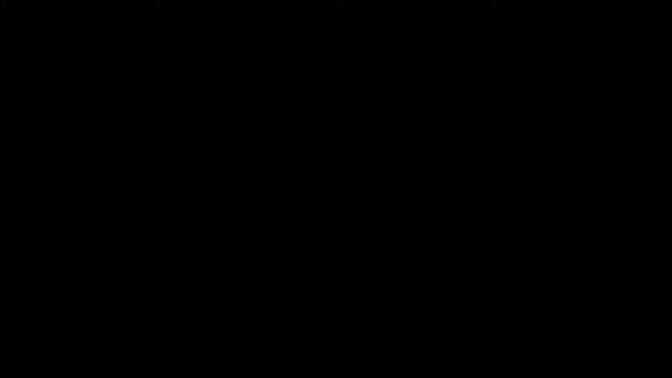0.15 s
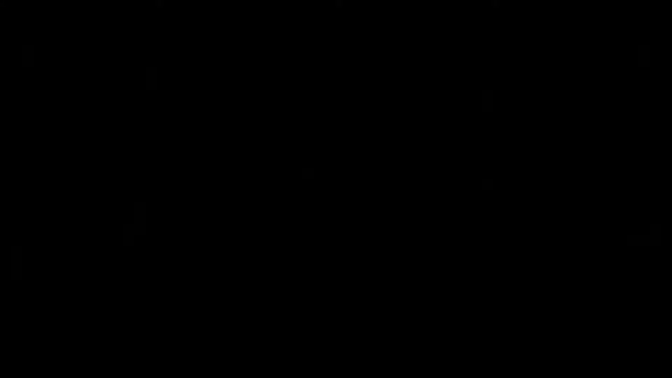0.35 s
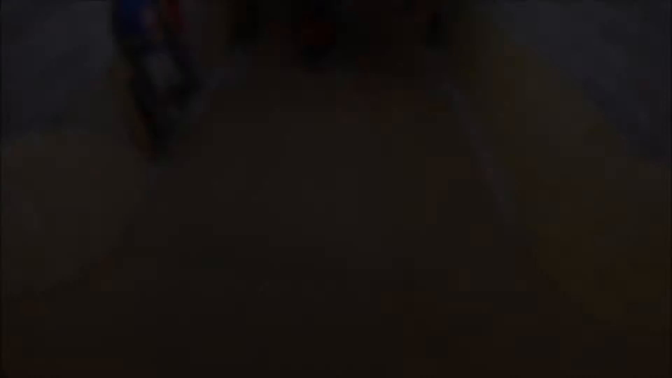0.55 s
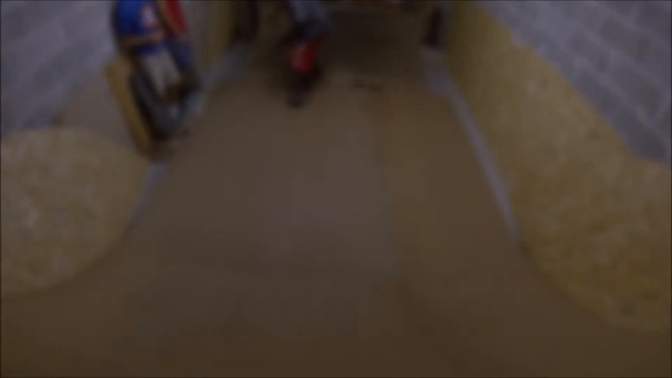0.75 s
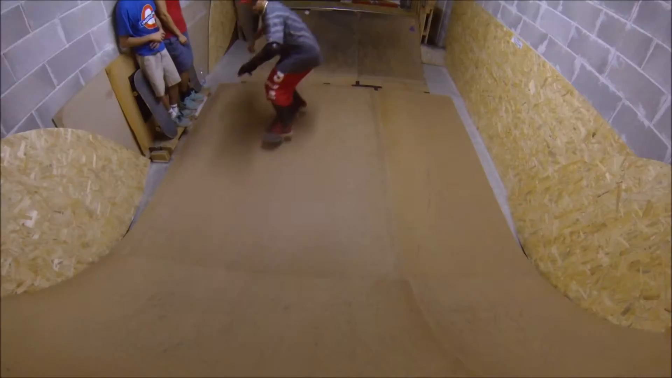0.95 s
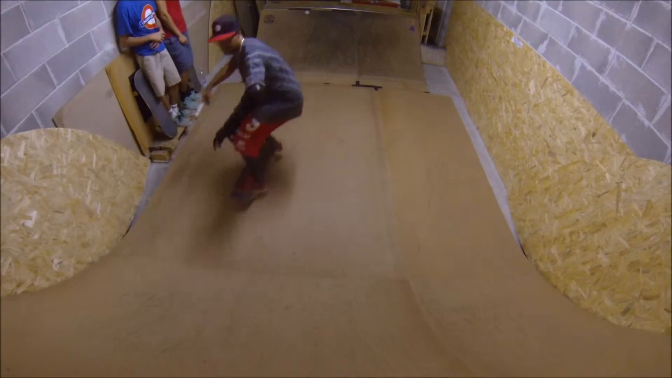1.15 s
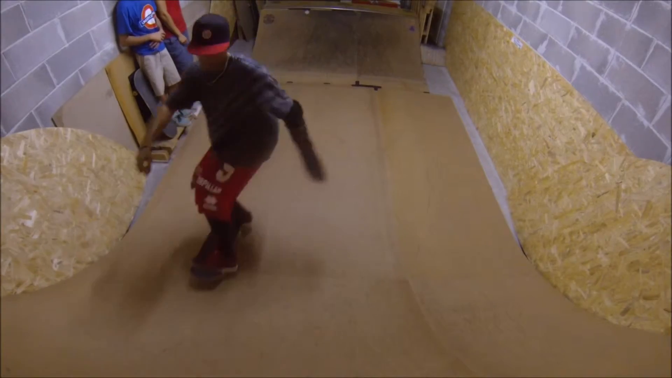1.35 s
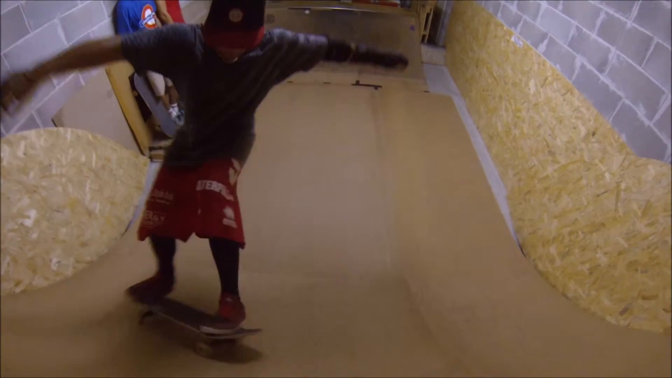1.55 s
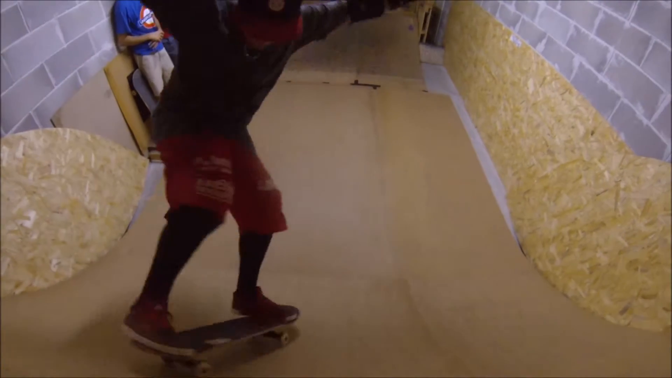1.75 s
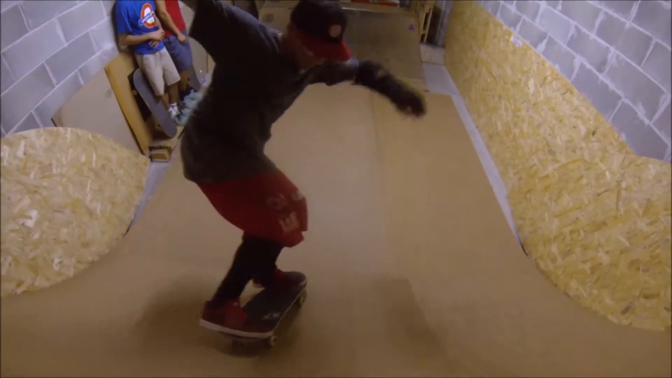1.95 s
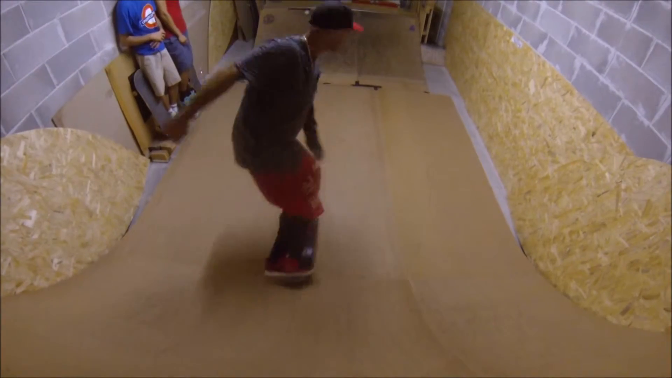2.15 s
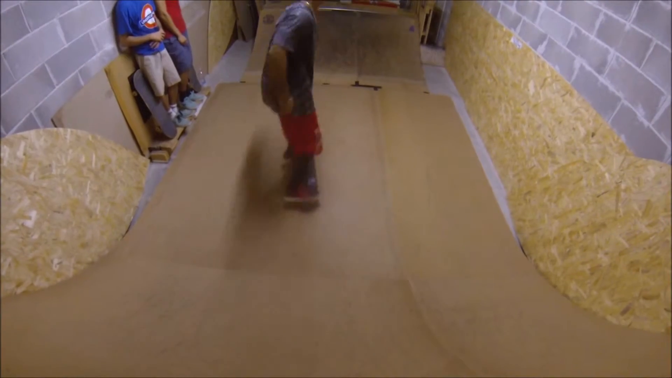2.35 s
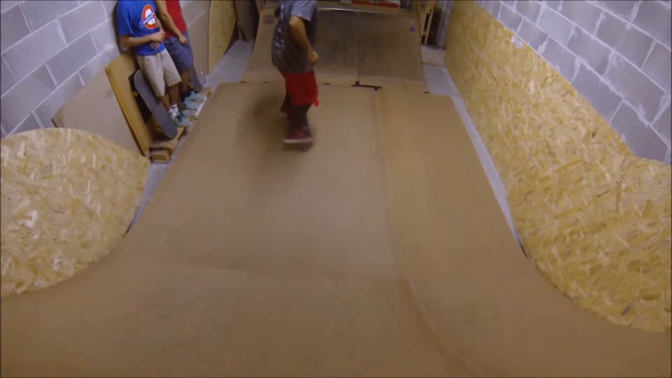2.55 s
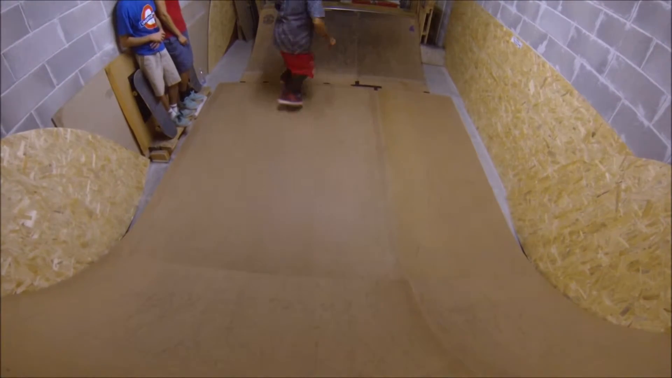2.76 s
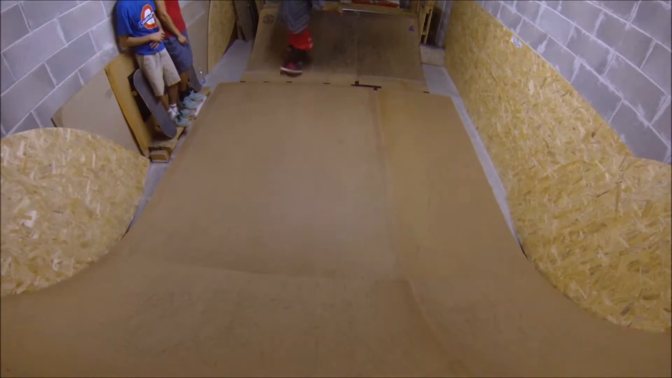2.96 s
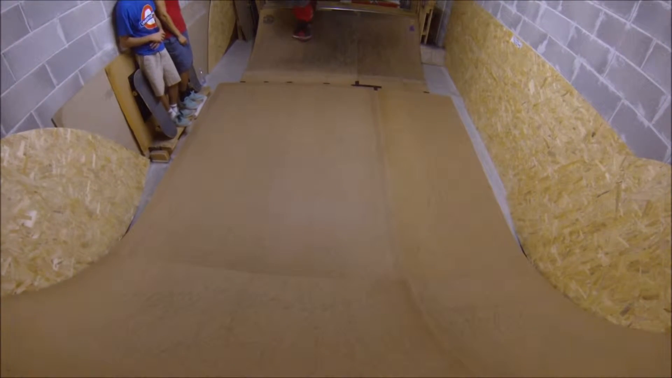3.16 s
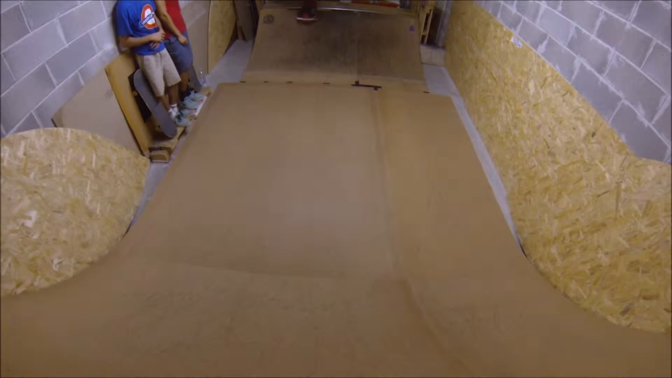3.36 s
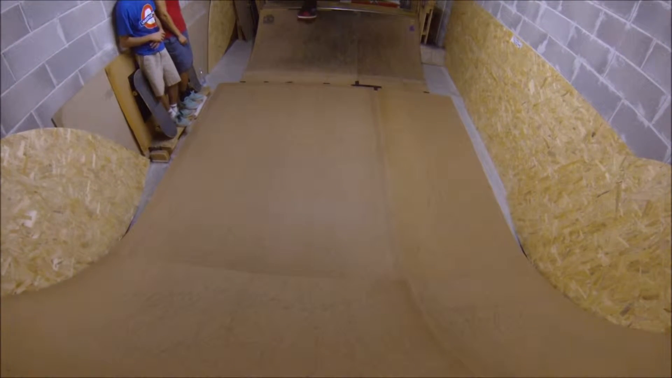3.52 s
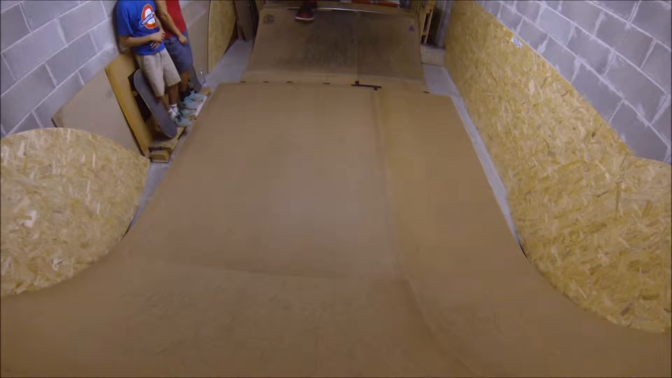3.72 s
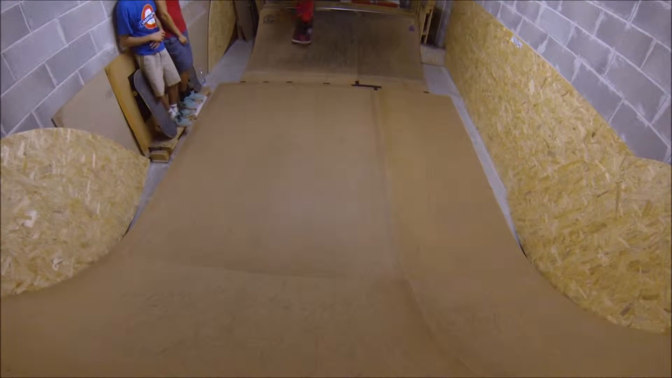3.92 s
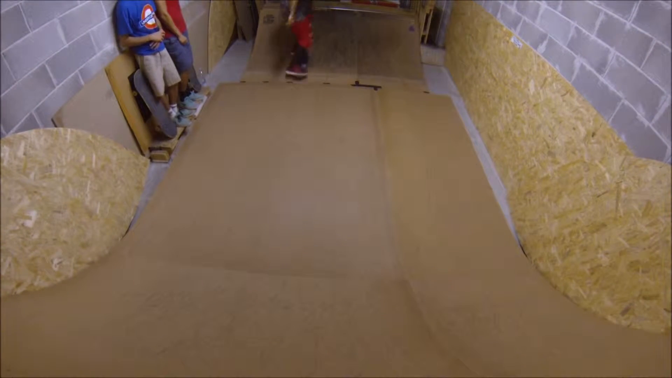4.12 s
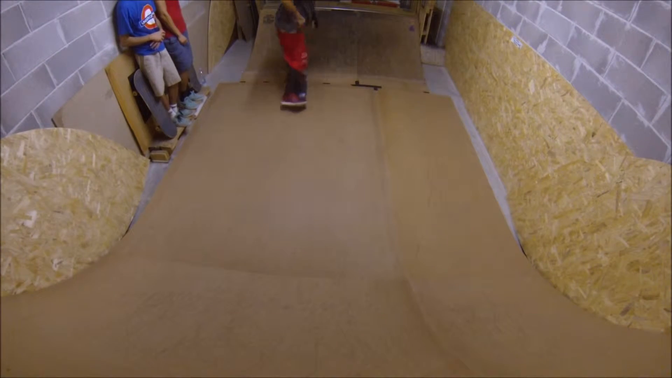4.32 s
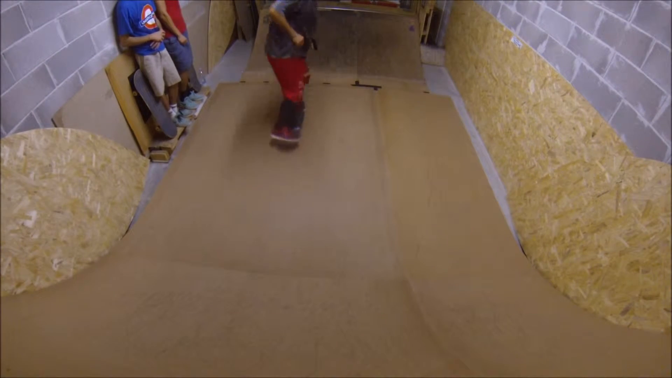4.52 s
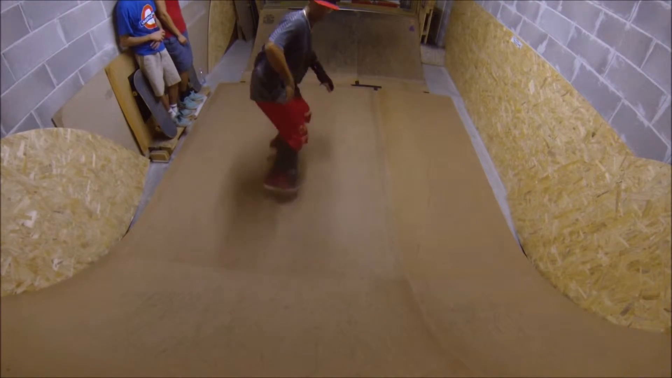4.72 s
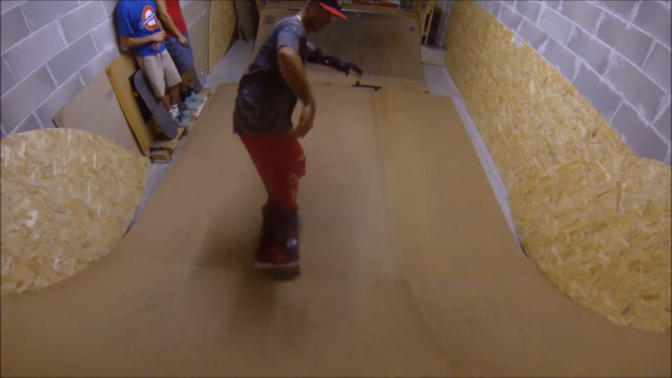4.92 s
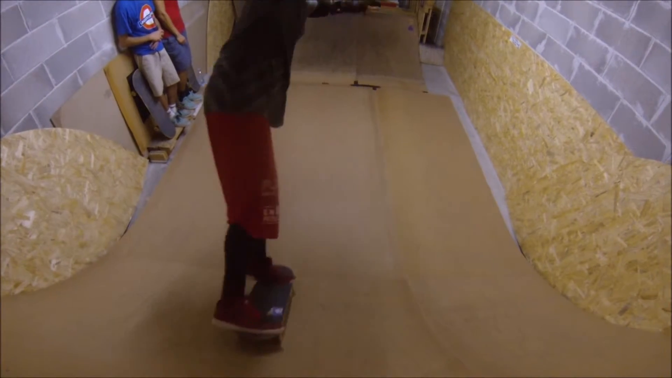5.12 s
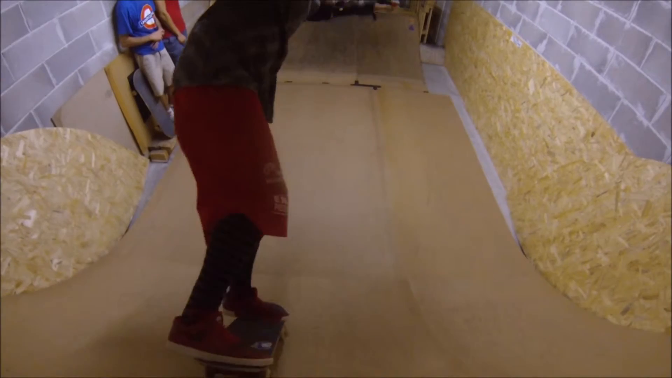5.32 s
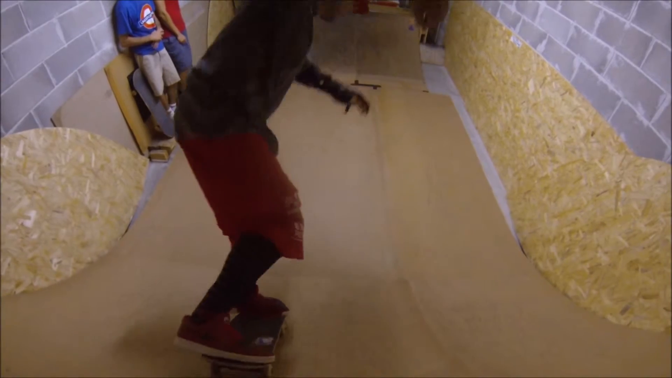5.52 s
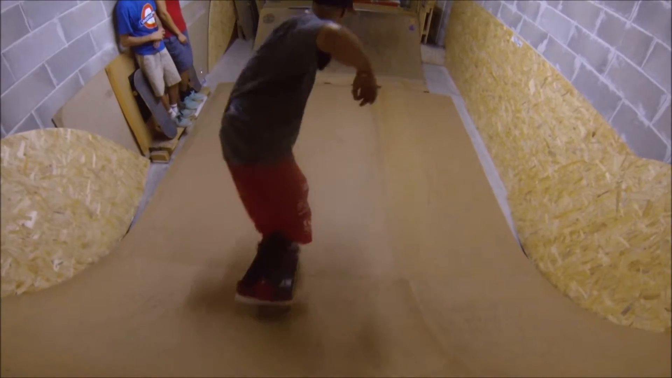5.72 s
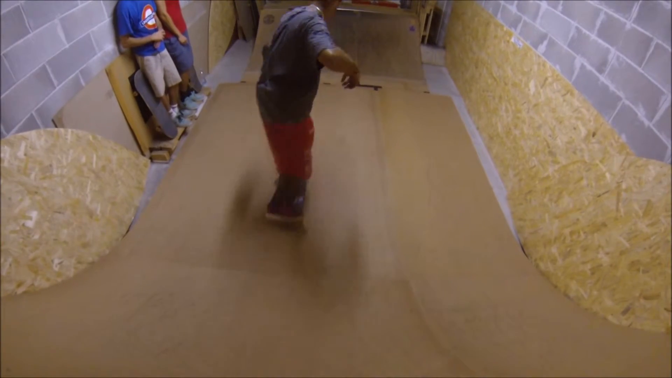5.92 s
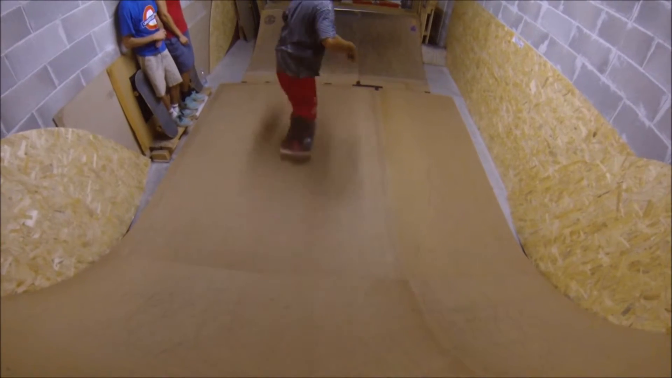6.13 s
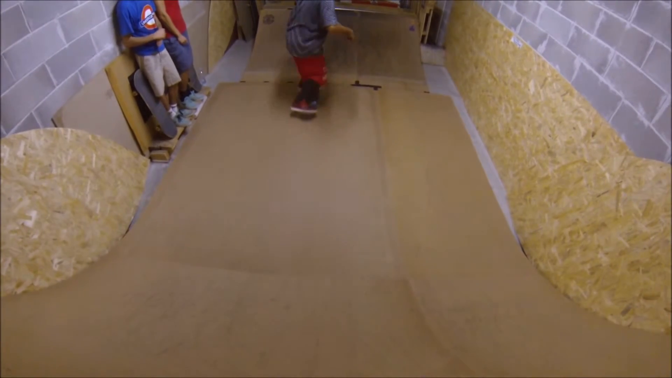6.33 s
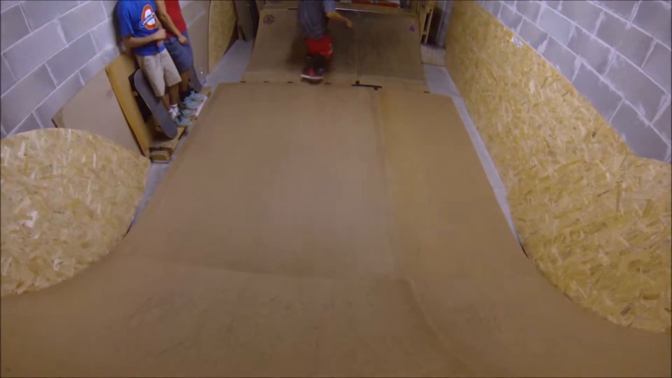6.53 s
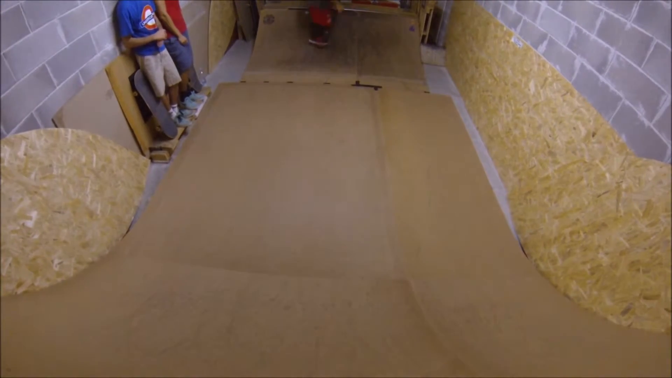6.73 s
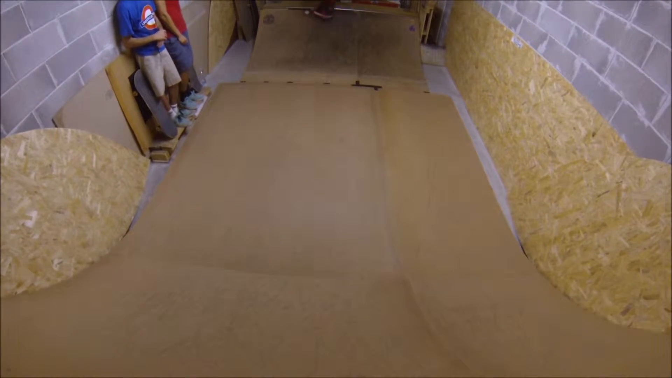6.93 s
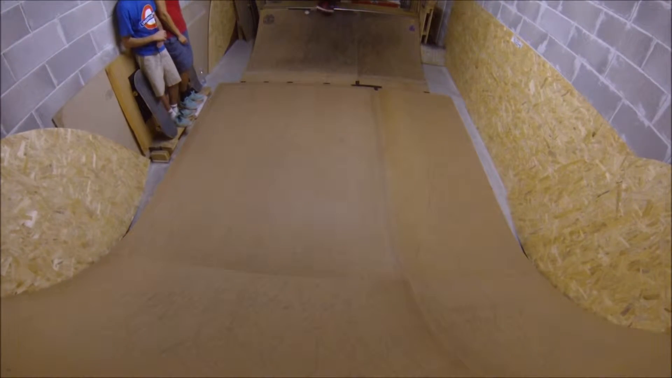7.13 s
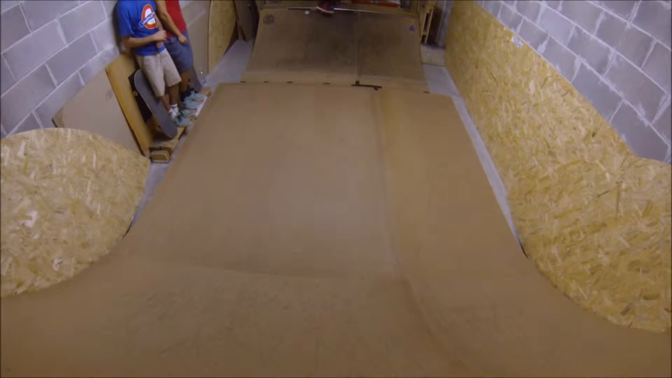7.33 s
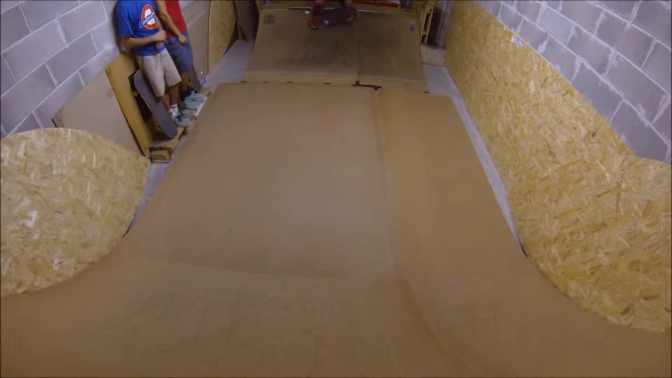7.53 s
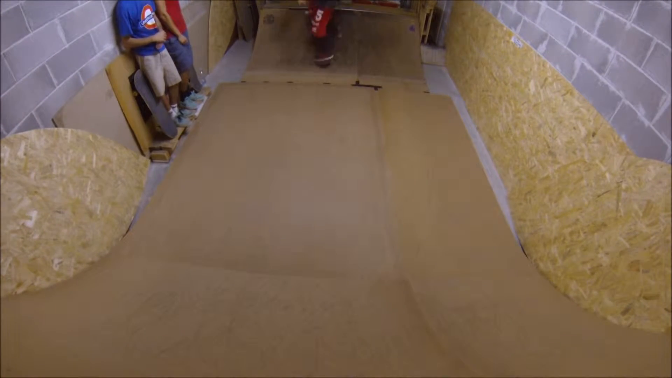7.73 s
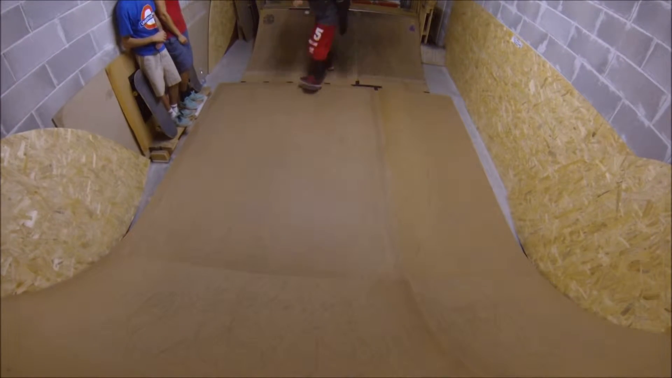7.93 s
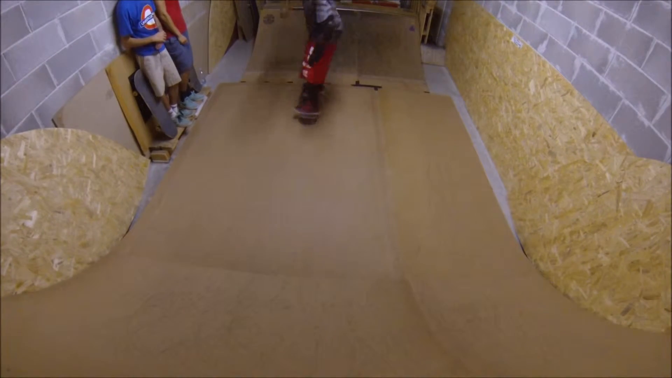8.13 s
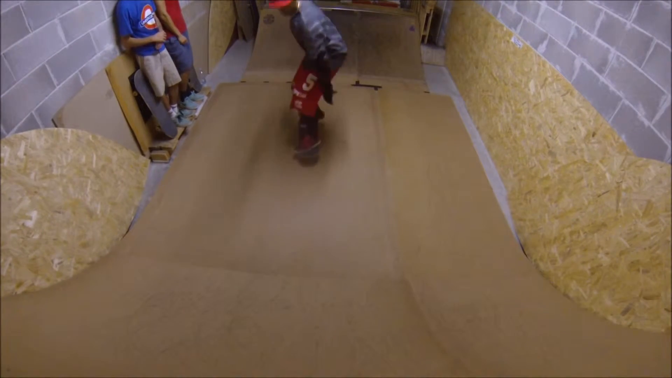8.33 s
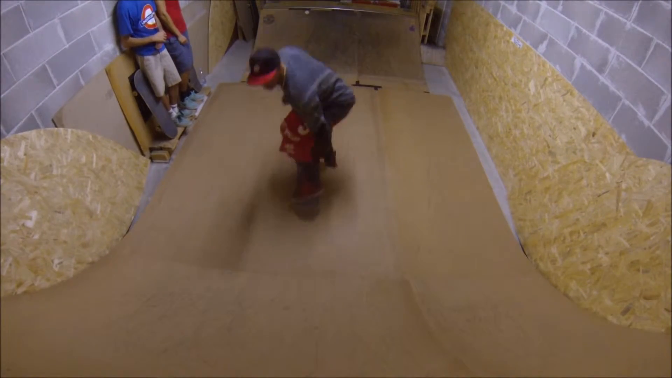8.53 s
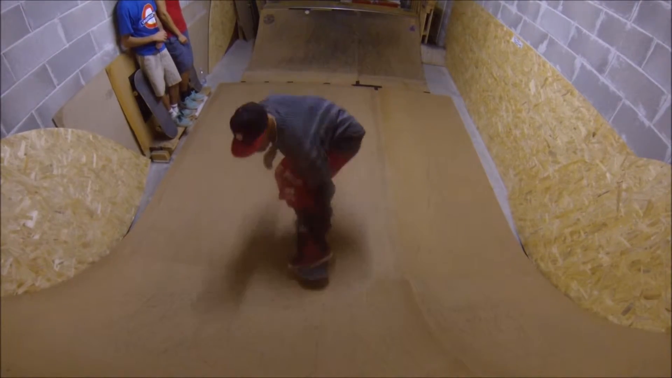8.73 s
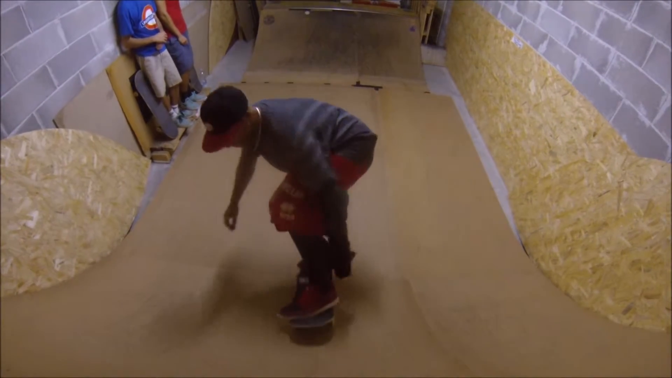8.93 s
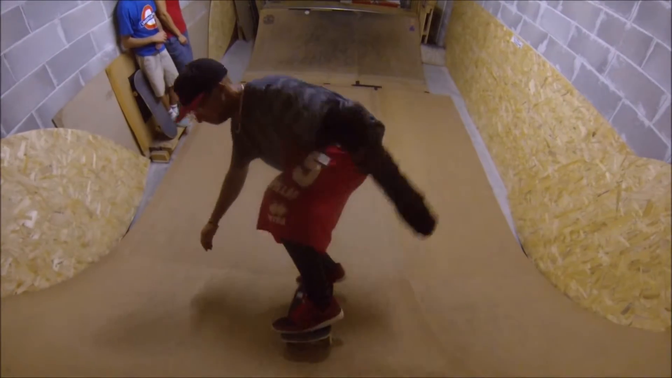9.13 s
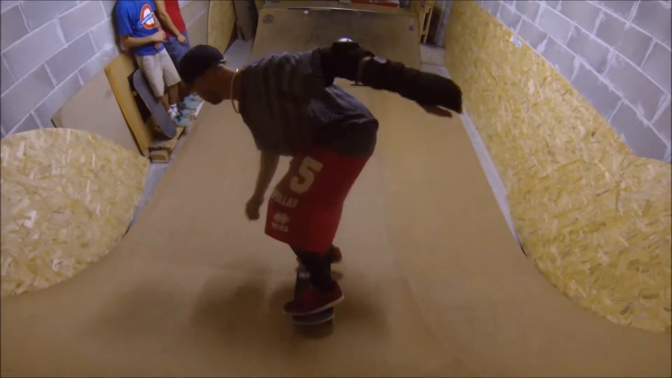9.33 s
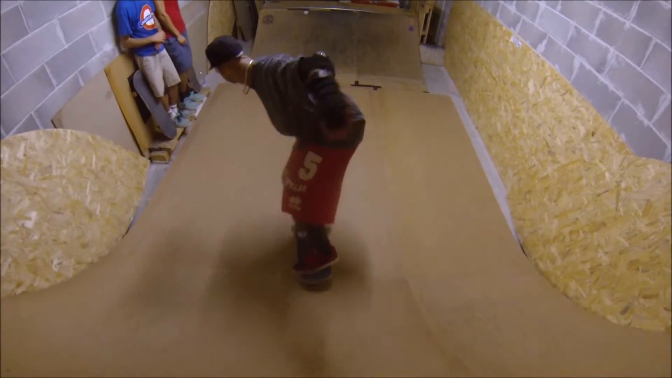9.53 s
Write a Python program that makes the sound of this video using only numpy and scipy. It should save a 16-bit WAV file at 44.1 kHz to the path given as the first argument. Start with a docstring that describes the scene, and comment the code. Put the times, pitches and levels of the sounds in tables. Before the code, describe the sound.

Near silence and faint rumble open, then a double clack at 0.55 s and hollow wooden rolling that swells. From 1.2 to 2.45 s the skateboard is close: deep panel rumble, dense woody knocks, thumps and thin dry snaps buzzing the microphone case. It recedes, clacking roomily around 2.9-3.0, with a sharp clack at 3.45, a lull near 3.7 and another clack at 4.03. Rolling returns, with close knocks from 4.9 to 6.0, briefly thinning around 5.5 before a tight cluster near 5.75. It fades away; distant clacks hit at 6.6, 6.9 and 7.1 amid quiet gaps. Two tiny metallic pings come at about 7.7, then softer far clacks around 7.8-8.2. The rumble approaches again, with knocks and snaps at 8.65-9.1, a dip, and a final snap and knock near 9.47. Small hard-walled room, short reverberation, fixed single-channel microphone.

```python
"""A faint rolling rumble comes first, then swells as a skateboard runs to and fro on a hollow plywood ramp.
Three random grits under the wheels drive resonances of frame, panels, deck, wheels and bearings.
Seams, pivots and the far coping give thumps as decaying sines, and knocks and clacks as ringing chatters.
Near knocks also buzz a closed camera case; a loose washer pings as decaying sines.
A small block-walled room answers by convolution with sparse decaying tails."""
import sys
import numpy as np
from scipy import signal
from scipy.fft import rfft, irfft, next_fast_len
from scipy.io import wavfile
from scipy.ndimage import uniform_filter1d

SR = 44100
rng = np.random.default_rng(int(sys.argv[2]) if len(sys.argv) > 2 else 0)


def undo_db(level):
    """Turn decibels back into plain size, where 20 dB means ten times bigger."""
    steps = np.asarray(level, float) / 20
    return 10 ** steps


def wav_record(signal):
    """Record a signal, one row per channel, as 16-bit PCM in the file named by sys.argv[1]."""
    frames = np.transpose(np.atleast_2d(signal))
    bounded = np.clip(frames, -1, 1)
    # unit amplitude maps onto the largest positive 16-bit level
    quanta = np.round(bounded * 32767).astype(np.int16)
    wavfile.write(sys.argv[1], SR, quanta)


N = 422037  # length in samples
RING_SIZE = next_fast_len(N + SR)  # leaves a second for ringing to die


def evened(x):
    """Normalisation: scales a signal to rms 1."""
    return x / np.sqrt(np.mean(x ** 2) + 1e-20)


def add(mix, start_s, sound):
    """Superposition: adds a sound to the mix in place from start_s."""
    part = mix[round(start_s * SR):][:len(sound)]
    part += sound[:len(part)]


# Reverberation time of the block walls by frequency: pitch_hz [Hz], t60_s [s]
ROOM_DECAY = [(100, 0.68), (260, 0.48), (700, 0.69), (1840, 0.33), (4850, 0.62), (11000, 0.39)]


def room(x):
    """Diffuse reverberation: three sparse tails take turns, each band decaying exponentially at its own rate."""
    out, t = np.zeros(N), np.arange(N) / SR
    band_hz, band_t60_s = np.transpose(ROOM_DECAY)
    slots = np.arange(240, SR - 12, 12)  # one reflection in every 12 samples
    for k in range(3):
        taps = np.zeros(SR)
        taps[slots + rng.integers(0, 12, len(slots))] = rng.choice([-1., 1.], len(slots))
        hz, lag_s, spectrum = signal.stft(taps, SR, nperseg=512)
        t60_s = np.interp(np.log(hz + 1), np.log(band_hz), band_t60_s)
        decay = undo_db(-60 * lag_s / t60_s[:, None])
        tail = signal.istft(spectrum * decay, SR, nperseg=512)[1]
        turn = np.cos(np.pi * (1.3 * t + k / 3))
        out += signal.oaconvolve(x * turn, tail / np.linalg.norm(tail))[:N]
    return out / np.sqrt(3 / 2)  # the squared turns sum to 3/2


def body(modes, size=RING_SIZE):
    """Modal superposition: parallel steep resonances of alternating sign form a frequency response."""
    hz = np.fft.rfftfreq(size, 1 / SR)
    response = 0
    for k, (pitch_hz, width_hz, level_db) in enumerate(modes):
        response = response + (-1) ** k * undo_db(level_db) / (1 + 2j * (hz - pitch_hz) / width_hz) ** 2
    return response


def ring(drive, modes):
    """Forced vibration: a long drive is filtered by the resonances of a body."""
    return irfft(rfft(drive, RING_SIZE) * body(modes), RING_SIZE)[:N]


def grit(per_s, spread_db, lump_db, lump_s):
    """Random impulse process: bumps of wood grain under the wheels, a few large, clustered in lumps."""
    size = undo_db(spread_db * np.minimum(rng.exponential(1, N), 5)) * rng.choice([-1., 1.], N)
    width = int(lump_s * SR)
    lumps = evened(uniform_filter1d(uniform_filter1d(rng.standard_normal(N), width), width))
    return size * (rng.random(N) < per_s / SR) * undo_db(lump_db * lumps)


# Rolling swells with the speed of the board, as levels ahead of the output stage:
# start_s [s], deck_db [dB], bass_db [dB], treble_db [dB]
ROLLING_LEVELS = [(0.2, -49.5, -45, -61.5), (0.38, -47, -46, -52.5), (0.51, -30, -33, -46.5),
                  (0.7, -25.5, -25.5, -46), (1.03, -32.5, -47, -50.5), (1.19, -27.5, -36, -45.5),
                  (1.32, -16.5, -32, -42.5), (1.42, -21.5, -29, -44), (1.65, -21, -28, -41.5),
                  (1.82, -36.5, -34, -55), (1.89, -30.5, -29, -45.5), (2.0, -36, -34.5, -59.5),
                  (2.17, -20, -27, -45.5), (2.25, -25, -34, -51), (2.29, -17, -18, -46),
                  (2.36, -23.5, -25, -50), (2.6, -32.5, -54, -52), (2.81, -38.5, -38, -53),
                  (2.91, -23, -32, -45.5), (3.06, -20.5, -22, -44), (3.25, -28, -25.5, -47),
                  (3.42, -40, -34, -51), (3.7, -52, -43, -52.5), (3.82, -45, -35, -54.5),
                  (3.88, -28, -23, -46), (3.98, -35, -22.5, -50), (4.2, -29.5, -26, -47.5),
                  (4.45, -22, -29, -45.5), (4.601, -30.5, -47, -47.5), (4.79, -26, -37, -47.5),
                  (4.86, -21.5, -25, -44), (5.16, -23, -20.5, -47), (5.44, -41.5, -42, -65),
                  (5.55, -54, -42, -74), (5.64, -39.5, -38.5, -58.5), (5.719, -23, -19.5, -44.5),
                  (5.96, -24.5, -28, -52.5), (6.25, -39, -49, -57.5), (6.46, -39, -45, -58),
                  (6.65, -21.5, -19.5, -44.5), (6.91, -30, -38, -49), (7.04, -52, -34, -54.5),
                  (7.14, -25.5, -35, -43), (7.3, -46, -34, -51.5), (7.44, -42, -43, -51.5),
                  (7.5, -34, -26, -42.5), (7.69, -37, -27, -53), (7.82, -28.5, -21.5, -44.5),
                  (8.16, -25.5, -29.5, -45.5), (8.32, -29.5, -48, -46.5), (8.5, -28.5, -43, -46),
                  (8.62, -22.5, -28, -44.5), (8.7, -18, -23.5, -39), (8.88, -22, -23, -47),
                  (9.07, -32, -27.5, -49), (9.16, -42.5, -43, -58), (9.35, -39, -28.5, -54),
                  (9.55, -20, -22.5, -48)]
# Times with the board on the camera's half of the ramp: start_s [s], end_s [s]
NEAR_TIMES = [(1.2, 3.1), (4.75, 6.25), (8.348, 8.8)]
# Resonances of frame, panels, deck, wheels and bearings:
# pitch_hz [Hz], width_hz [Hz, at half amplitude], level_db [dB, relative within the body]
FRAME_THUD = [(34, 37, -4), (44.8, 9.4, -6.5), (63.5, 19, 1), (91.84, 8.9, 1.5)]
PANEL_BOOM = [(111.1, 36, -0.5), (145, 25.7, -5.5), (186.9, 27.7, 1.5), (220, 20, 0), (263.2, 17.3, -5)]
DECK = [(315, 194, 1), (439, 106, -4.5), (494.5, 73, 2), (615, 112, -8.5), (708.6, 85, -2), (824, 210, -12),
        (1013, 347, -19)]
WHEEL_RATTLE = [(1200, 550, 1), (1692, 690, 5), (1947, 300, 9.5), (2277, 440, 6), (3036, 580, -3),
                (3650, 830, -1.5)]
BEARING_FIZZ = [(5420, 3800, 6.5), (6970, 850, 9.5), (8170, 1900, 9), (11150, 2400, -10),
                (13000, 2800, -14)]


def rolling():
    """Forced vibration: slow, coarse and fine grit drive the bodies in differing mixtures, direct and via walls."""
    start_s, *curves = np.transpose(ROLLING_LEVELS)
    t = np.arange(N) / SR
    deck_db, bass_db, treble_db = (np.interp(t, start_s, db) for db in curves)
    near = uniform_filter1d(sum((t > a) * (t < b) * 1. for a, b in NEAR_TIMES), size=4000)

    # Panels follow a level between deck and bass: +1 dB near, -1.5 dB far
    boom_db = deck_db + 0.42 * (bass_db - deck_db) - 1.5 + 2.5 * near
    # Bearings follow the treble, at -60.5 dB where it is -47 dB
    fizz_db = -60.5 + 0.99 * (treble_db + 47)

    slow = grit(per_s=430, spread_db=3.5, lump_db=3.5, lump_s=0.034)
    coarse = grit(per_s=900, spread_db=2.0, lump_db=3.0, lump_s=0.019)
    fine = grit(per_s=6000, spread_db=2.5, lump_db=2, lump_s=0.008)
    slow, coarse, fine = (evened(d) + 0.65 * evened(room(d)) for d in (slow, coarse, fine))

    parts = [
        (DECK, coarse + 0.39 * slow, deck_db),
        (FRAME_THUD, slow + 1.28 * coarse, bass_db),
        (PANEL_BOOM, coarse + 0.88 * slow, boom_db),
        (WHEEL_RATTLE, fine + 1.23 * coarse, treble_db),
        (BEARING_FIZZ, fine, fizz_db),
    ]
    return sum(undo_db(level_db) * evened(ring(drive, modes)) for modes, drive, level_db in parts)


# Pings of a loose washer on the axle: start_s [s], level_db [dB, added to the mode levels]
PINGS = [(7.656, -44.5), (7.716, -45.5)]
# Its modes: pitch_hz [Hz], level_db [dB, relative], t60_s [s]
WASHER_MODES = [(2480, 5, 0.079), (7390, -1, 0.05), (10950, -14, .06)]


def washer():
    """Free vibration: thin steel rings briefly as exponentially decaying sines."""
    t, out = np.arange(SR // 4) / SR, np.zeros(N)
    ping = 0
    for pitch_hz, level_db, t60_s in WASHER_MODES:
        ping = ping + undo_db(level_db - 60 * t / t60_s) * np.sin(2 * np.pi * pitch_hz * t)
    for start_s, level_db in PINGS:
        add(out, start_s, undo_db(level_db) * ping * np.minimum(t / 0.002, 1))
    return out


def chatters(events):
    """Random contact: each event gets contacts of random size in about every eighth sample."""
    size, chance = rng.standard_normal((len(events), 4096, 2)).transpose(2, 0, 1)
    return size * (chance > 1.15)


def blow(chatter, decay_s, parts, stretch=1, sudden=0.46, rise=11):
    """Impact excitation: contacts that swell and die exponentially ring each part (modes, peak dB)."""
    size = len(chatter)
    u = np.arange(1, size + 1) / SR / decay_s  # time in decay constants
    swell = np.minimum(rise * u + sudden, 1)  # sudden: starting share, rise: gain per decay constant
    burst = rfft(chatter * swell * np.exp(-u))
    sound = 0
    for modes, peak_db in parts:
        moved = [(pitch_hz * stretch, width_hz, level_db) for pitch_hz, width_hz, level_db in modes]
        rung = irfft(burst * body(moved, size), size)
        sound = sound + undo_db(peak_db) * rung / abs(rung).max()
    return sound


# Thin dry snaps, only in the upper buzz of the case: start_s [s], level_db [dB, peak before output]
SNAPS = [(1.2254, -35), (1.7674, -29), (1.7998, -40), (1.965, -36), (2.0434, -39), (2.071, -36),
         (2.1211, -42), (2.2353, -41), (2.4164, -37.5), (2.4578, -40), (2.4763, -39), (5.476, -51),
         (5.635, -46), (6.2317, -40), (8.4226, -36), (8.6453, -28), (8.7747, -32), (8.8356, -25),
         (8.8707, -27), (8.951, -37), (9.126, -34.5), (9.4674, -20)]
# Lower and upper resonances of the camera case:
# pitch_hz [Hz], width_hz [Hz, at half amplitude], level_db [dB, relative within the body]
CASE = [(1200, 143, 6.5), (1770, 400, 7.5), (1875, 810, -0.5), (2300, 190, 6)]
CASE_TOP = [(2860, 1100, 5), (3320, 770, 1.5), (3896, 200, 6.5), (4320, 680, -6)]


def snaps():
    """Short impact spectrum: a millisecond or two of chatter rings the stiff upper modes of the case."""
    out = np.zeros(N)
    modes = CASE[-1:] + CASE_TOP + [(2900, 1900, 8.7)]
    for (start_s, level_db), chatter in zip(SNAPS, chatters(SNAPS)):
        add(out, start_s, blow(chatter, 0.0017, [(modes, level_db)]))
    return out


# Wheels thump over seams and weight lands on the panels:
# start_s [s], level_db [dB, of the decay at its start, before output], pitch_hz [Hz]
THUMPS = [(0.567, 3, 109.5), (0.593, -7, 107), (1.279, -1.5, 193), (1.316, -0.5, 186), (1.382, 0, 179),
          (1.456, -5, 216), (1.523, -3, 132), (1.541, -4.5, 133), (2.17, 0, 210), (2.214, -5, 163),
          (2.277, -4.5, 198), (2.305, -9, 170), (2.341, -11.5, 168), (2.441, -9.5, 150), (3.068, -5.5, 120),
          (3.456, -7, 95), (3.837, -8, 100), (4.032, -2.5, 104), (4.063, -3, 90), (4.878, -1, 178),
          (4.912, -3, 197), (4.984, 0.5, 214), (5.024, -5, 192), (5.062, -8.5, 129), (5.182, -7.5, 158),
          (5.737, -11.5, 169), (5.782, -11, 191), (5.813, -10, 126), (5.861, -15, 147), (5.947, -5, 184),
          (5.995, -5, 126), (6.597, -10.5, 211), (6.635, -19, 169), (6.678, -5.5, 145), (6.76, -9.5, 119),
          (7.118, -13, 128), (7.206, -12.5, 120), (7.773, -10, 234), (7.824, -2.5, 185), (7.862, -5.5, 127),
          (8.011, -5.5, 228), (8.57, -7.5, 233), (8.66, -9.5, 119), (8.68, 1, 206), (8.791, -3, 212),
          (8.812, -3, 145), (8.866, -1.5, 180), (9.008, -7, 210), (9.032, -9, 155), (9.064, -7.5, 104),
          (9.472, -6, 190)]


def thumps():
    """Single-mode response: a soft push sets one panel mode in decaying vibration."""
    near, far = np.zeros(N), np.zeros(N)
    t = np.arange(SR // 2) / SR
    t60_s = 0.048
    for start_s, level_db, pitch_hz in THUMPS:
        push = np.minimum(t * pitch_hz * 3.7, 1)
        sound = undo_db(level_db - 60 * t / t60_s) * np.sin(2 * np.pi * pitch_hz * t) * push
        add(near, start_s, sound)
        add(far, start_s, undo_db(-3.0) * sound)
    return near, far


# Clacks at the far end, as direct peak levels before output:
# start_s [s], rattle_db [dB], deck_db [dB], pitch_hz [Hz, of the deck mode], fizz_db [dB]
CLACKS = [(0.3157, -48, -47, 550, -47.5), (0.5532, -20.5, -14, 814, -29.5), (0.5628, -19.5, -7, 560, -27),
          (0.756, -33.5, -20, 576, -38), (0.854, -31.5, -17.5, 520, -35.5), (2.8782, -31, -27, 553, -41),
          (2.9028, -37, -9.5, 533, -37), (3.0069, -28, -6, 580, -37), (3.4398, -7.5, -6.5, 785, -22.5),
          (3.4511, -27, -7.5, 750, -23), (3.4801, -48, -8.5, 786, -36), (3.8096, -25, -17, 710, -34.5),
          (4.0268, -14.5, -7.5, 696, -23.5), (4.0456, -46, -29, 680, -36.5),
          (4.2736, -30.5, -13, 500, -31.5), (4.3867, -30, -23, 490, -29.5), (4.4358, -32, -15, 496, -53),
          (6.49, -37, -22, 614, -46), (6.523, -33.5, -18, 514, -43), (6.6214, -30.5, -13, 562, -35),
          (6.8848, -17.5, -4.5, 766, -28.5), (7.0928, -13, -10, 740, -28), (7.502, -39, -35, 650, -39.5),
          (7.546, -37, -28, 840, -38.5), (7.7719, -41, -18, 440, -47), (7.8172, -19.5, -19, 770, -31.5),
          (7.8456, -41, -11, 510, -28.5), (7.9865, -31, -28, 603, -37), (8.0136, -31, -13, 510, -36),
          (8.0417, -22.5, -13.5, 595, -31.5), (8.1406, -26, -16, 646, -32.5),
          (8.1715, -20, -18, 543, -32.5)]


def clacks():
    """Distant impact: the struck spot favours one deck mode and the room gets a large share."""
    near, far = np.zeros(N), np.zeros(N)
    click = signal.unit_impulse(4096)
    for (start_s, rattle_db, deck_db, pitch_hz, fizz_db), chatter in zip(CLACKS, chatters(CLACKS)):
        struck_deck = DECK + [(pitch_hz, 340, 6)]
        parts = [(WHEEL_RATTLE, rattle_db), (struck_deck, deck_db), (BEARING_FIZZ, fizz_db)]
        add(near, start_s, blow(chatter, 0.0085, parts))
        room_db = -2.5 - 0.31 * deck_db  # soft clacks are blunter, with a larger share of room
        add(far, start_s, undo_db(room_db) * blow(click, 0.001, parts))
    return near, far


def ticks():
    """Random contact: small knocks at chance moments while the board is near follow the rolling levels."""
    per_s, spread_db = 14, 3.5
    start_s = np.concatenate([rng.uniform(a, b, round(per_s * (b - a))) for a, b in NEAR_TIMES])
    at, deck_db, _, treble_db = np.transpose(ROLLING_LEVELS)
    deck_db, treble_db = np.interp(start_s, at, deck_db), np.interp(start_s, at, treble_db)
    deck_vary, buzz_vary, fizz_vary = spread_db * rng.standard_normal((len(start_s), 3)).T
    pitch_hz = rng.choice([mode[0] for mode in CASE], len(start_s))
    tick_deck_db = deck_db + 5 + deck_vary
    tick_buzz_db = treble_db + 15 + buzz_vary
    tick_fizz_db = treble_db - 31 + fizz_vary
    return list(zip(start_s, tick_deck_db, tick_buzz_db, pitch_hz, tick_fizz_db))


# Knocks near the camera, as direct peak levels before output; the direct sound leads start_s by 2 ms:
# start_s [s], deck_db [dB], buzz_db [dB, case], pitch_hz [Hz, of the case buzz], fizz_db [dB]
KNOCKS = [(1.2294, -21, -38, 1110, -40), (1.2814, -23, -40, 1180, -32.5), (1.3163, -15, -41, 1180, -32.5),
          (1.379, -27, -39, 1260, -56), (1.3947, -13, -23.5, 1200, -30.5), (1.4531, -15, -26, 1300, -30.5),
          (1.5444, -9.5, -17, 2020, -43), (1.5554, -12, -36, 1770, -34), (1.6307, -5, -19.5, 1360, -43),
          (1.7346, -7, -13, 2120, -48), (1.7429, -6, -11, 1130, -49), (1.8114, -17, -26, 1230, -64),
          (1.8194, -20.5, -44, 1750, -64), (1.8821, -18, -29, 1130, -37), (1.9135, -4.5, -18, 1350, -48),
          (1.9909, -11, -24.5, 1240, -53), (2.1214, -21.5, -39, 1260, -55), (2.1634, -19, -30, 1270, -46),
          (2.1824, -9, -18, 1110, -56), (2.1929, -12, -15.5, 1220, -60), (2.2717, -7, -26, 1190, -37),
          (2.3044, -17, -38, 1130, -48), (2.4165, -13.5, -38, 1230, -53), (4.9159, -8.5, -26.5, 2200, -34),
          (4.9806, -27, -35, 1320, -54), (5.0235, -19, -34, 1186, -44), (5.0653, -11, -26, 1190, -25.5),
          (5.083, -6.5, -30, 1300, -50), (5.2105, -15.5, -29, 1200, -53), (5.1737, -8, -27.5, 1580, -35),
          (5.3044, -22, -40, 1200, -63), (5.3373, -22.5, -39, 2000, -70), (5.4765, -39, -54, 1260, -65),
          (5.6366, -30, -40, 1290, -68), (5.67, -16, -29, 1240, -58), (5.695, -11, -22.5, 2470, -41),
          (5.7374, -7.5, -17.5, 1710, -36.5), (5.7557, -4.5, -20, 1270, -40), (5.7738, -11, -38, 1180, -50),
          (5.789, -16, -28, 1150, -61), (5.8047, -8.5, -21, 1680, -49), (5.8229, -17, -21, 2270, -45),
          (5.8392, -4, -13, 1190, -53), (5.914, -19, -40.5, 1250, -44), (5.9863, -11, -38, 1230, -52),
          (8.666, -15, -27, 1270, -33.5), (8.774, -22.5, -24, 1267, -41), (8.8583, -10, -27, 1270, -40),
          (8.8714, -9, -25, 1150, -52), (9.0019, -19, -29.5, 1290, -51), (9.0344, -12, -27.5, 1150, -54),
          (9.0678, -14, -33, 1210, -60), (9.257, -24.5, -34, 1320, -53), (9.2898, -17.5, -34.5, 1150, -41),
          (9.4661, -10, -21, 2390, -56), (9.4988, -14, -24.5, 1200, -61)]


def knocks():
    """Close impact: mostly direct sound; each knock's lower modes shift a few percent in pitch at random."""
    near, far = np.zeros(N), np.zeros(N)
    events = KNOCKS + ticks()
    stretches = 1 + 0.036 * rng.standard_normal(len(events))
    for event, chatter, stretch in zip(events, chatters(events), stretches):
        start_s, deck_db, buzz_db, pitch_hz, fizz_db = event
        struck_case = CASE + [(pitch_hz / stretch, 350, 5)]  # blow() stretches it back to pitch_hz
        struck_deck = DECK + [(585.5, 220, 23.7)]
        top_db = buzz_db + 0.31 * (fizz_db - buzz_db) - 2.5  # upper buzz, from case buzz and fizz
        low_parts = [(struck_case, buzz_db), (struck_deck, deck_db)]
        high_parts = [(CASE_TOP, top_db), (BEARING_FIZZ, fizz_db)]
        wood = blow(chatter, 0.0066, low_parts, stretch, sudden=0.25, rise=1)  # swells more slowly
        treble = blow(chatter, 0.0061, high_parts)
        add(near, start_s - 0.002, wood + treble)
        add(far, start_s, undo_db(-18) * (wood + treble))
    return near, far


def blows():
    """Direct and reverberant fields: thumps, clacks and knocks share one room response."""
    near, far = np.sum([thumps(), clacks(), knocks()], axis=0)
    return near + room(far)


def scene():
    """Superposition: all sources add at the microphone, in one channel."""
    return (rolling() + washer() + snaps() + blows())[None]


def band_limit(x):
    """A steep low-pass at the top of the band."""
    return signal.sosfilt(signal.butter(12, 15280, fs=SR, output="sos"), x)


def record(dry):
    """Soft saturation: after initial silence and a 0.9 ms fade-in, tanh rounds off the loudest peaks."""
    start_s = 0.064
    fade_in = np.clip((np.arange(N) / SR - start_s) / 0.0009, 0, 1)
    mix = 1.32 * np.tanh(dry * fade_in / 1.058)
    return band_limit(mix)


dry = scene()
out = record(dry)
wav_record(out)
```